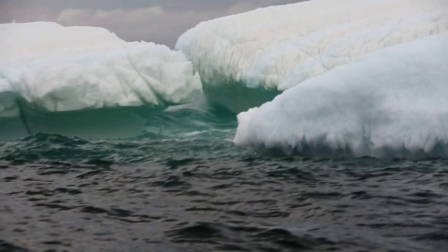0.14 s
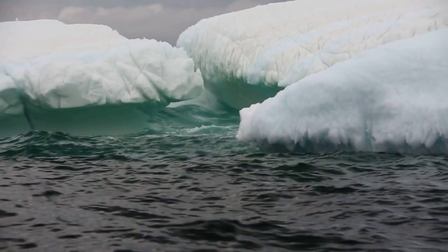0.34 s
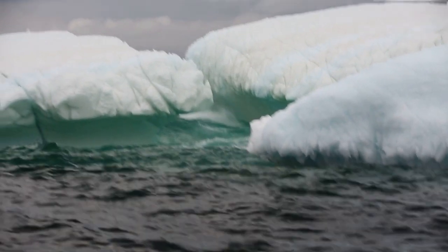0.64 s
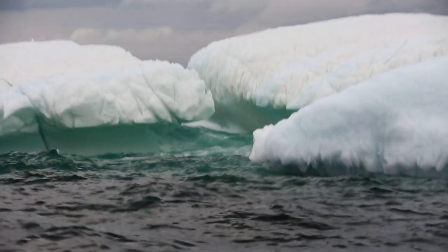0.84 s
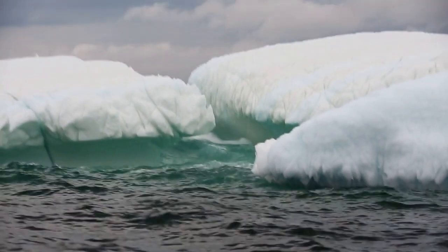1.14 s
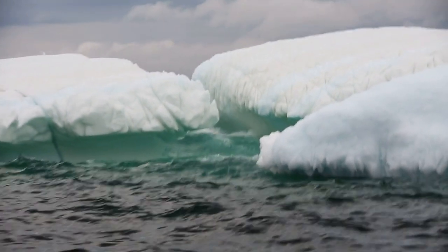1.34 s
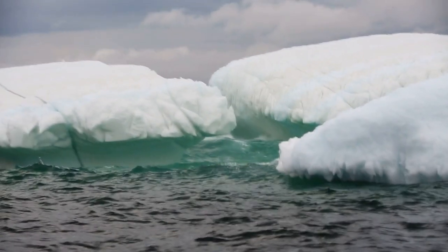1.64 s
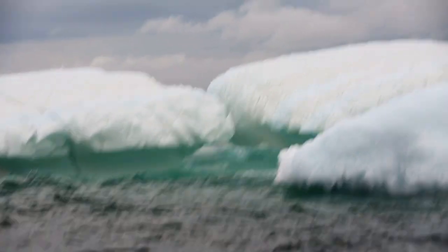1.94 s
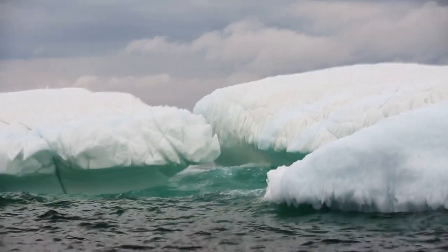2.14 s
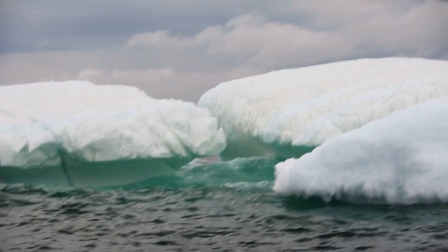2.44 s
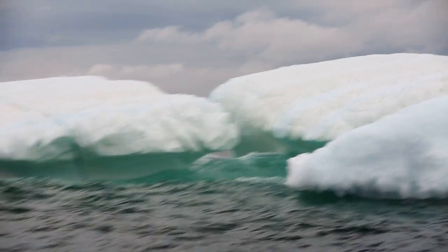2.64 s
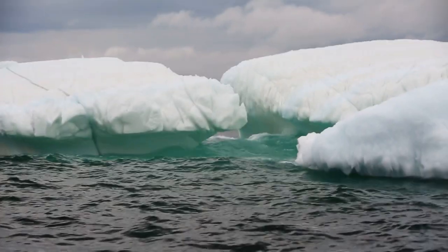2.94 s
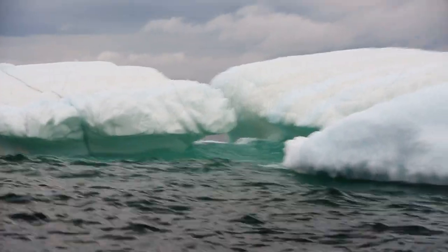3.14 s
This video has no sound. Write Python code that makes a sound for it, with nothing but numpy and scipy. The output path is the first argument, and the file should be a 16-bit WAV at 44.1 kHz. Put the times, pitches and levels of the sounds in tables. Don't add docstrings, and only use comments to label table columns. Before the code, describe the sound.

Swell washes round floating ice throughout, with soft foam hiss, gurgling laps, low lumpy hull rumble and thin wind. Bright spray and ice ticks cluster before 0.25 s; a small spring mechanism clacks and whirrs close by at 0.33-0.45. A wave slaps the hull at 0.58, with heavy wind thumps on the microphone around 0.65. Surf swells near 1.3-1.5 amid ticks and drips; a strong gust buffets at 3.3.

```python
import sys
import numpy as np
from scipy import signal
from scipy.fft import rfft, irfft, next_fast_len
from scipy.io import wavfile
from scipy.ndimage import uniform_filter1d, map_coordinates

SR = 44100
rng = np.random.default_rng(int(sys.argv[2]) if len(sys.argv) > 2 else 0)


def gain_from_db(level_db):
    decades = np.asarray(level_db, float) / 20
    return 10 ** decades


def file_out(sig):
    cols = np.atleast_2d(sig).T
    lim = np.clip(cols, -1, 1)
    pcm = np.round(lim * 32767).astype(np.int16)
    wavfile.write(sys.argv[1], SR, pcm)


N = 145530


def unit(x):
    return x / np.sqrt(np.mean(x ** 2) + 1e-20)


def along(points, hz):
    f, v = np.transpose(points)
    return np.interp(np.log(hz + 1), np.log(f + 1), v)


def curve(rows):
    return np.interp(np.arange(N) / SR, *np.transpose(rows))


def wobble(rate):
    knots = rng.standard_normal(N // 20)
    return map_coordinates(knots, [np.arange(N) * rate / SR])


def filtered(x, response):
    m = next_fast_len(len(x) + 8192)
    return irfft(rfft(x, m) * response(np.fft.rfftfreq(m, 1 / SR)), m)[:len(x)]


def peak(f, hz, width_hz):
    return 1j * f * width_hz / (hz * hz - f * f + 1j * f * width_hz)


def add(out, s, x):
    part = out[max(round(s * SR), 0):][:len(x)]
    part += x[:len(part)]


def rush(spectrum, patchy_db):
    z = signal.stft(rng.standard_normal(N), nperseg=512)[2]
    field = uniform_filter1d(rng.standard_normal(z.shape), size=5, axis=0)
    field = uniform_filter1d(field, size=10, axis=1)
    x = signal.istft(z * gain_from_db(patchy_db * unit(field)), nperseg=512)[1][:N]
    return unit(filtered(x, lambda hz: gain_from_db(along(spectrum, hz))))


def bubbles(hz, spread, cycles, rise, scatter_db, count, size):
    u, g = rng.random((count, 2)), rng.standard_normal((count, 1))
    turns = np.clip(hz * np.exp(spread * g), 60, 9500) * np.arange(size) / SR
    life = turns / cycles
    tone = np.sin(2 * np.pi * turns * (1 + rise * life / 2))
    level = gain_from_db(-scatter_db * np.log(1.02 - u[:, 1:]))
    grain = tone * life * np.exp(-3 * life) * level
    at = (u[:, :1] * N).astype(int) + np.arange(size)
    return unit(np.bincount(at.ravel(), grain.ravel(), minlength=N)[:N])


def wind():
    # t/s, level/dB
    breeze = [(0.0, -56.5), (0.62, -62), (1.04, -62), (1.47, -59.5), (1.89, -59), (2.16, -58), (2.64, -58),
              (2.9, -59), (3.27, -53.5)]
    # f/Hz, level/dB per Hz
    air = [(1500, -30.5), (3500, 1.5), (6000, -0.5), (9000, -8.5), (12000, -18)]
    mist = bubbles(5820, .25, 4, 0.11, scatter_db=6, count=5000, size=128)
    hiss = unit(rush(air, patchy_db=0.2) + gain_from_db(-7.5) * mist)
    return hiss * gain_from_db(curve(breeze) + 2 + 1.4 * wobble(6.9))


def boat():
    # t/s, level/dB
    hull = [(0.0, -32), (0.25, -26), (.46, -33.5), (0.61, -27.5), (0.8, -27.5), (1.02, -26.5),
            (1.29, -28.5), (1.44, -25.5), (1.58, -23), (1.72, -26.5), (1.84, -25.5), (1.97, -28),
            (2.1, -28), (2.29, -26.5), (2.39, -24), (2.68, -27.5), (2.86, -27.5), (3.2, -25)]
    # f/Hz, level/dB per Hz
    rumble = [(11, -42), (18, -19), (33, 3.5), (54, 1), (91, 0.5), (123, -4.5), (200, -11), (260, -10.5),
              (440, -120)]
    return rush(rumble, patchy_db=0.0) * gain_from_db(curve(hull) + 0.59 * wobble(7.7))


def sea():
    # t/s, level/dB
    surf_swell = [(0, -43), (.45, -43), (.8, -42), (1.0, -39.5), (1.15, -40.5), (1.27, -36.5),
                  (1.45, -36.5), (1.7, -39.5), (1.9, -41), (2.08, -41), (2.22, -39), (2.45, -42.5),
                  (2.75, -43), (3.05, -43), (3.27, -41)]
    # t/s, level/dB
    lap_swell = [(0, -29), (.2, -28.5), (.33, -29.5), (.43, -29.5), (.53, -27), (.575, -24.5), (.64, -30),
                 (.93, -31), (1.11, -28.5), (1.3, -25.5), (1.5, -26.5), (1.75, -32), (1.95, -26.5),
                 (2.2, -27), (2.45, -28.5), (2.65, -32.5), (2.95, -32.5), (3.27, -28)]
    # f/Hz, level/dB per Hz
    foam = [(350, -43), (700, -6.5), (1080, -6.5), (1400, -5.5), (3000, -13.5), (4500, -21), (7000, -38.5),
            (11000, -58.5)]
    # f/Hz, level/dB per Hz
    slosh = [(59, -18), (100, -4), (140, -4), (200, -8), (260, -12.5), (420, -11), (850, -22), (1600, -40),
             (3300, -79.5)]
    shared = 0.2 * wobble(6.22)
    fizz = bubbles(1732, 0.393, 2.08, 0.27, scatter_db=1.0, count=8000, size=256)
    surf = unit(rush(foam, patchy_db=0.02) + gain_from_db(-7) * fizz)
    surf = surf * gain_from_db(curve(surf_swell) + shared + 0.79 * wobble(16))
    gurgle = bubbles(401, 0.607, 4.19, 0.27, scatter_db=2, count=1200, size=2000)
    laps = unit(rush(slosh, patchy_db=1.3) + gain_from_db(-10) * gurgle)
    laps = laps * gain_from_db(curve(lap_swell) + shared + 0.9 * wobble(12))
    return surf + laps


def spray():
    # t/s, peak level/dB, f/Hz
    ticks = [(.051, -38, 6800), (.074, -35.5, 6360), (.088, -42, 7500), (.105, -34, 5500),
             (0.118, -42, 7500), (.122, -43, 7200), (.145, -44, 7500), (.219, -43, 7000), (.133, -39, 7500),
             (0.139, -38, 7400), (0.166, -36, 6540), (.226, -37, 7200), (0.234, -36, 6540),
             (0.677, -36, 7250), (0.953, -42, 6900), (1.166, -37, 6500), (1.171, -43, 6500),
             (1.214, -48, 6500), (1.283, -43, 5600), (1.285, -42, 7950), (1.356, -42, 8000),
             (1.368, -30, 5960), (1.371, -30.5, 6500), (1.394, -39, 7000), (1.414, -44, 9000),
             (1.417, -37, 6600), (1.436, -30, 5000), (1.634, -47, 8500), (1.854, -48, 7000),
             (1.872, -37.5, 5300), (2.443, -38.5, 5000), (1.871, -32, 3280), (2.088, -45, 7000),
             (2.173, -36, 5000), (2.239, -39, 6000), (2.307, -40, 5500), (2.345, -46, 7000),
             (2.458, -36, 4500), (2.458, -45, 7300), (3.063, -37, 5500), (3.28, -40, 5500),
             (2.608, -41, 8000), (2.855, -40, 5500)]
    # t/s, peak level/dB, f/Hz, T60/s
    drips = [(.315, -37, 2900, 0.02), (.371, -23.5, 610, 0.079), (1.064, -22.5, 364, 0.22),
             (1.26, -25, 2700, 0.014), (1.437, -23.5, 4100, 0.011), (2.06, -24.5, 687, 0.067),
             (2.544, -27, 1010, 0.036), (2.545, -23.5, 590, 0.035), (2.547, -30, 1400, .03),
             (3.259, -31, 764, 0.022), (.446, -30, 800, 0.027), (1.268, -21, 850, 0.024),
             (1.274, -30, 2700, .015), (1.336, -35, 5040, .012), (1.883, -34, 4250, .015),
             (2.064, -40, 6600, 0.013), (2.328, -44.5, 7200, .015), (2.443, -29, 4160, 0.011),
             (2.555, -32, 3000, 0.011), (2.8, -45, 6600, .012), (3.229, -38, 6260, .012)]
    tick_t60_s, tick_width = 0.0033, 0.44
    echo_s, echo_db = 0.0026, -11
    out, t = np.zeros(N), np.arange(4096) / SR
    for s, db, hz in ticks:
        crack = gain_from_db(-60 * t / tick_t60_s) * np.sign(rng.standard_normal(len(t)))
        crack[0] = 5.6
        crack += gain_from_db(echo_db) * np.roll(crack, round(echo_s * SR))
        crack = filtered(crack, lambda f: peak(f, hz, tick_width * hz) ** 2)
        add(out, s, gain_from_db(db + 1.5) * crack / abs(crack).max())
    for s, db, hz, t60 in drips:
        fade = gain_from_db(db - 60 * t / t60) * (1 - np.exp(-t / 0.00078))
        glide = t * (1 + 3 * t) + 0.00003 * wobble(500)[:len(t)]
        add(out, s, fade * np.sin(2 * np.pi * hz * glide))
    return out


def gusts():
    # t/s, peak level/dB, f/Hz, length/cycles
    eddies = [(0.401, -12.5, 133, 1.74), (0.614, -20.5, 233, 2.6), (0.536, -14.5, 92, 2.2),
              (0.647, -6, 69.4, 2), (.687, -8, 62.7, 1.5), (0.743, -18.5, 49.3, 2.6),
              (0.791, -13.5, 47.3, 2.1), (1.26, -18, 171, 4), (1.456, -9, 81, 1.5), (1.52, -17, 67, 1.2),
              (1.543, -15, 94, 2.4), (1.6, -19, 89.5, 1.2), (1.999, -18.5, 370, 3.5), (.065, -30, 101, 1.3),
              (0.276, -19, 62, 1.5), (0.339, -20, 90, 2), (.33, -23.5, 184, 3.5), (1.002, -19, 85, 2),
              (1.07, -19, 101, 3.2), (1.351, -18.5, 65, 1.9), (1.5, -28, 328, 13.4),
              (1.87, -28.5, 305, 6.9), (2.2, -25, 266, 8), (.22, -33, 460, 8.3), (1.44, -28.5, 510, 13),
              (1.775, -24.5, 325, 3.1), (1.821, -28.5, 500, 5.8), (2.175, -24, 129, 2.8),
              (2.35, -19.5, 103, 4.3), (2.765, -19, 60, 3.3), (3.049, -20.5, 129, 3.6),
              (3.19, -16, 81, 1.1), (2.288, -15, 131, 3.2), (2.918, -18.5, 51.7, 3.4),
              (3.268, -8.5, 57.4, 1.5), (3.278, -2.5, 110, 0.35), (3.301, -1.5, 45.2, 0.85)]
    # t/s, peak
    # level/dB, f/Hz, length/cycles
    thumps = [
        (.374, -21, 200, 2.2),
        (.56, -19, 390, 5),
        (.5768, -5.5, 105, .75),
        (.578, -16, 260, 2.5),
        (.591, -11, 85, 1.3),
    ]
    flutter_hz, flutter_db = 212, -23.5
    out, t = np.zeros(N), np.arange(-SR // 10, SR // 10) / SR
    for s, db, hz, cycles in eddies + thumps:
        noise = rng.standard_normal(len(t))
        flutter = unit(filtered(noise, lambda f: peak(f, flutter_hz, flutter_hz) ** 2))
        swell = gain_from_db(db - 22.5 * (t * hz / cycles) ** 2)
        add(out, s + t[0], swell * (np.cos(2 * np.pi * hz * t) + gain_from_db(flutter_db) * flutter))
    return out


def mechanism():
    # t/s, peak level/dB, T60/s, brightness/dB per octave
    blows = [
        (0.326, -30.5, 0.031, 5.5),
        (.3683, -18, 0.019, -0.5),
        (.3715, -18, 0.021, -6.5),
        (0.395, -33, .015, -6),
        (0.4455, -28, 0.013, -5),
        (.4475, -24.5, 0.026, -6.5),
    ]
    # f/Hz, width/Hz, level/dB
    case = [(715, 140, 2.5), (2130, 600, 6), (3660, 670, 9), (5750, 2400, -1.5), (8500, 1700, -13)]
    # f/Hz, level/dB
    spring = [(4250, -9.5), (4802, 3), (4940, -8), (5038, -7), (5350, -7.5), (6400, -26.5), (9600, -28.5)]
    # t/s, level/dB
    whirr = [(.32, -100), (.33, -56), (.34, -50), (.343, -35), (.355, -35), (.3575, -58), (.361, -42),
             (.378, -52), (.41, -100)]
    out, t = np.zeros(N), np.arange(4096) / SR
    for s, db, t60, tilt_db in blows:
        burst = gain_from_db(-60 * t / t60) * (1 - np.exp(-t / 0.00038)) * rng.standard_normal(len(t))
        burst[0] = 6

        def body(f):
            modes = sum((-1) ** k * gain_from_db(d) * peak(f, c, w) for k, (c, w, d) in enumerate(case))
            return gain_from_db(tilt_db * np.log2(f / 3000 + 0.032)) * (0.19 + modes)

        burst = filtered(burst, body)
        add(out, s, gain_from_db(db) * burst / abs(burst).max())
    t = np.arange(N) / SR
    ring = unit(sum(gain_from_db(db) * np.sin(2 * np.pi * hz * t + 0.7 * wobble(300)) for hz, db in spring))
    scrape = unit(filtered(rng.standard_normal(N), lambda f: peak(f, 3700, 5000) ** 2))
    return out + gain_from_db(curve(whirr)) * (ring + gain_from_db(-12) * scrape)


def scene():
    return (wind() + boat() + sea() + spray() + gusts() + mechanism())[None]


def band_limit(x):
    return signal.sosfilt(signal.butter(12, 13820, fs=SR, output="sos"), x)


def record(dry):
    # f/Hz, level/dB
    rolloff = [(8000, 0), (9500, -3.5), (10300, -11.5), (10800, -18), (11025, -25.5)]
    # f/Hz, level/dB
    mirror = [(11025, -8), (11600, -5), (12300, -19.5), (13500, -21.5), (14200, -61.5)]
    fold_hz = SR / 4
    padded = np.pad(dry[0], (0, SR // 10), "reflect")

    def band(hz):
        return (hz < fold_hz) * gain_from_db(along(rolloff, hz)) * hz ** 2 / (hz ** 2 + 15 ** 2)

    low = filtered(padded, band)
    flipped = low * np.cos(np.pi * np.arange(len(low)))
    image = filtered(flipped, lambda hz: (hz > fold_hz) * gain_from_db(along(mirror, hz)))
    return band_limit((low + image)[None, :N])


dry = scene()
out = record(dry)
file_out(out)
```